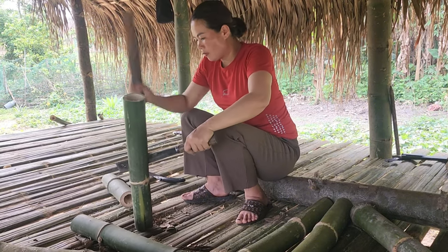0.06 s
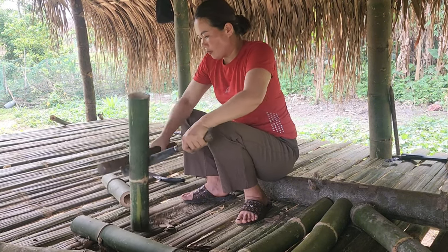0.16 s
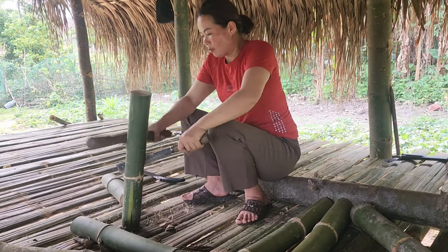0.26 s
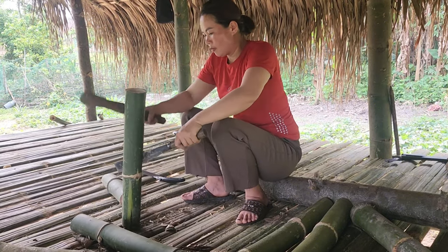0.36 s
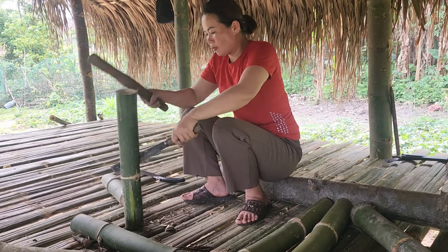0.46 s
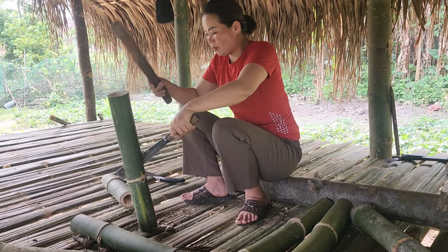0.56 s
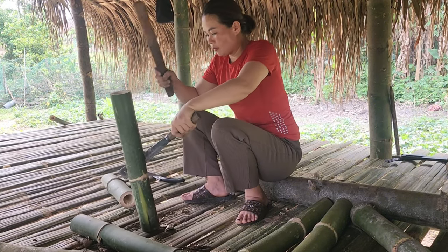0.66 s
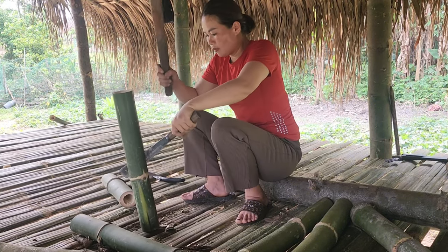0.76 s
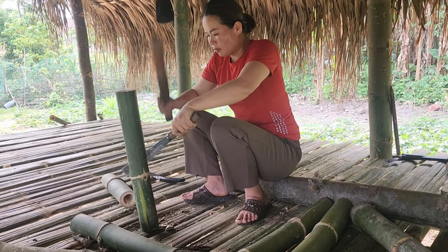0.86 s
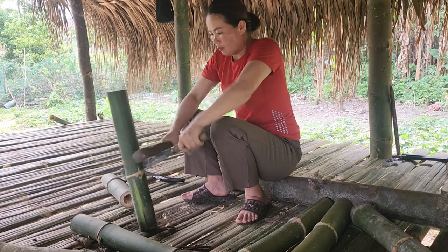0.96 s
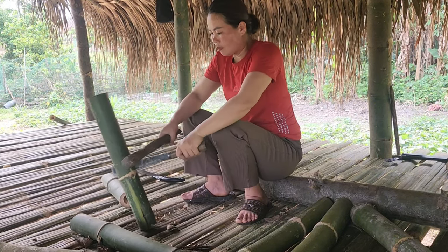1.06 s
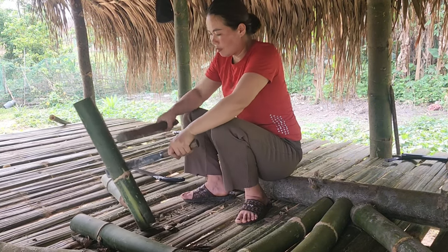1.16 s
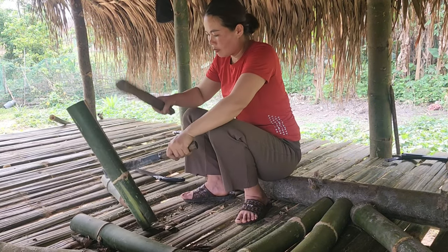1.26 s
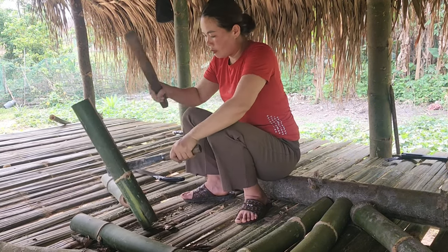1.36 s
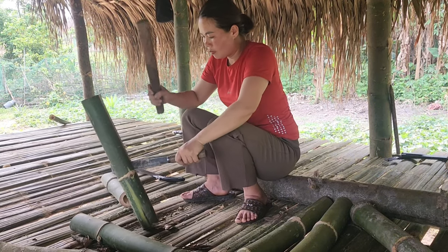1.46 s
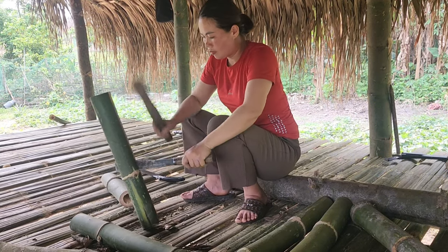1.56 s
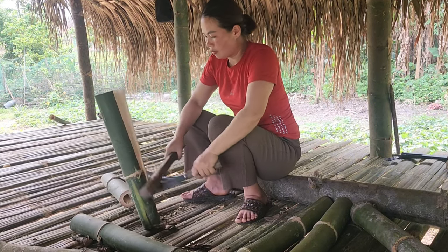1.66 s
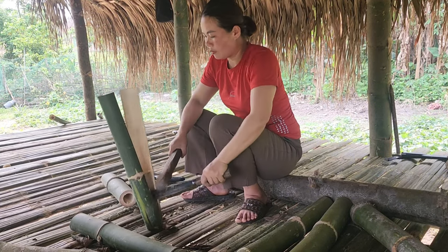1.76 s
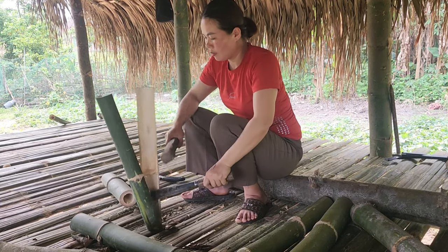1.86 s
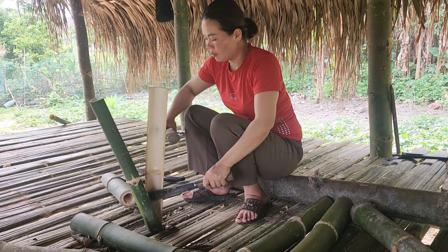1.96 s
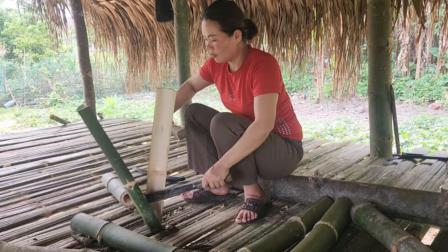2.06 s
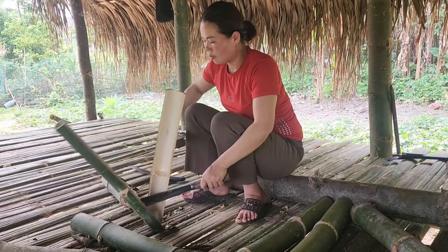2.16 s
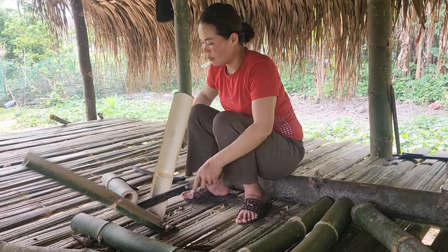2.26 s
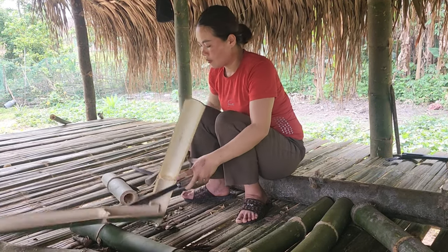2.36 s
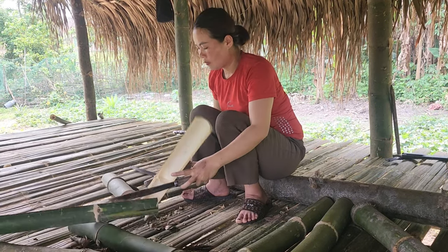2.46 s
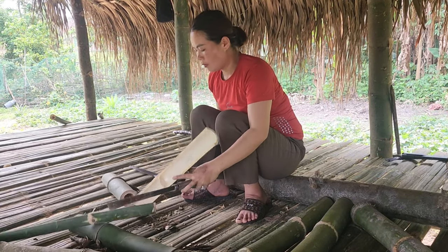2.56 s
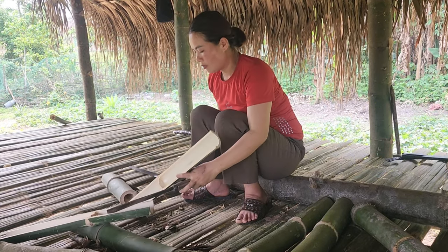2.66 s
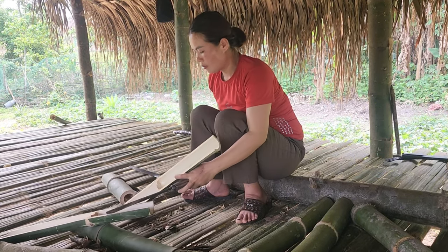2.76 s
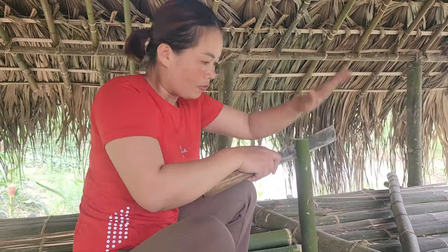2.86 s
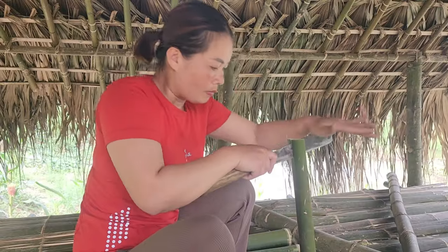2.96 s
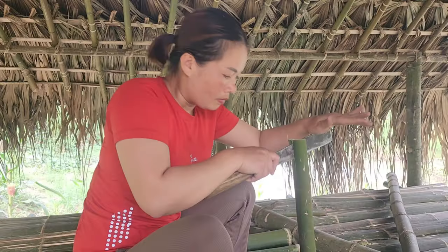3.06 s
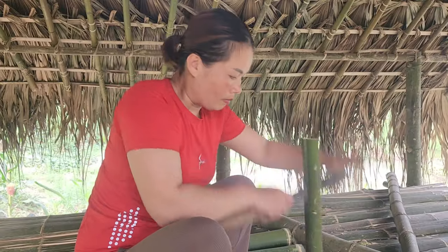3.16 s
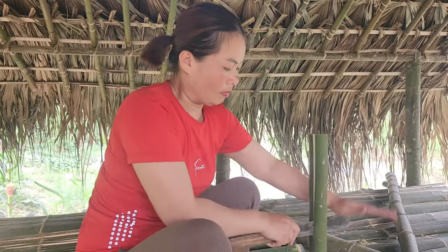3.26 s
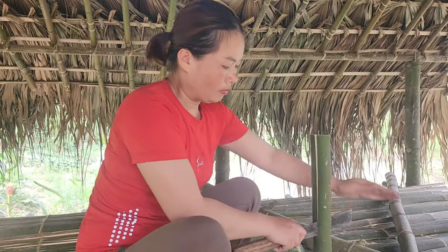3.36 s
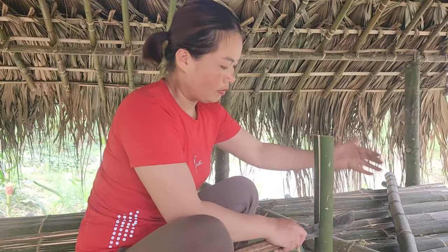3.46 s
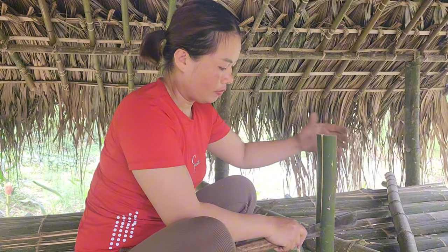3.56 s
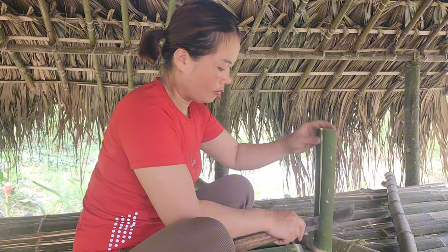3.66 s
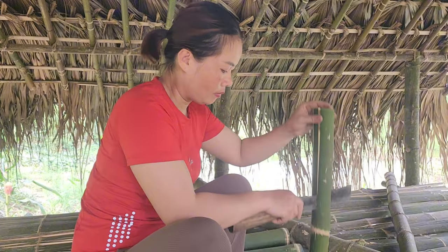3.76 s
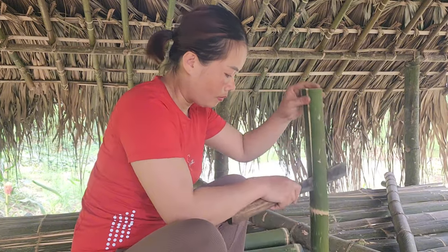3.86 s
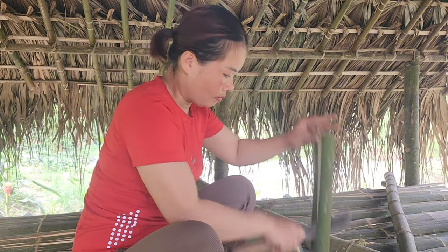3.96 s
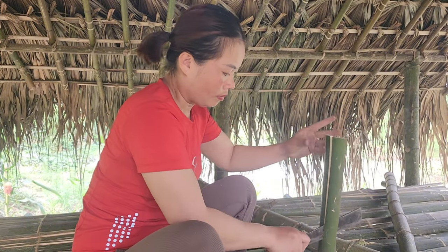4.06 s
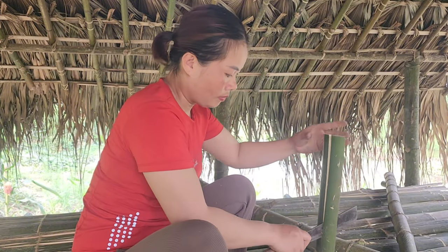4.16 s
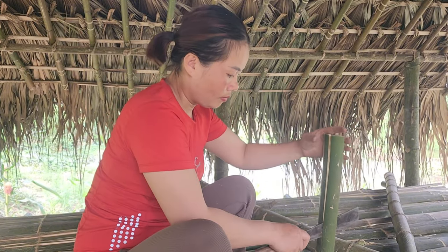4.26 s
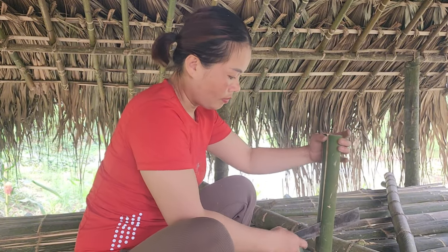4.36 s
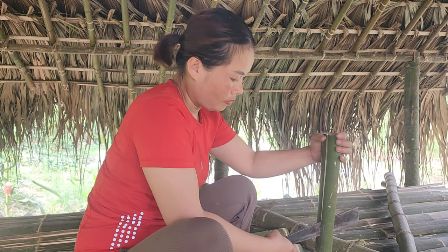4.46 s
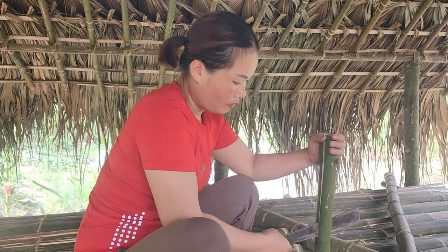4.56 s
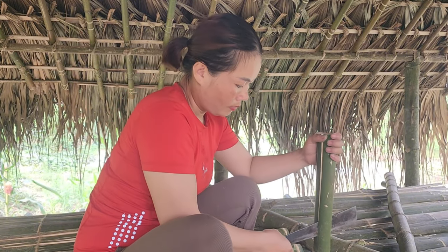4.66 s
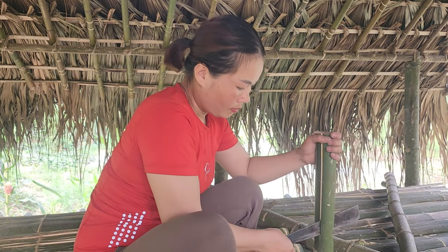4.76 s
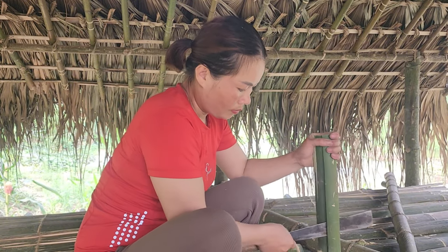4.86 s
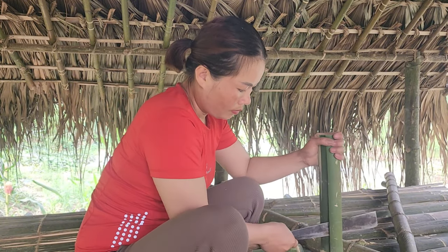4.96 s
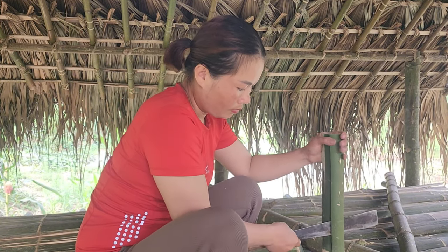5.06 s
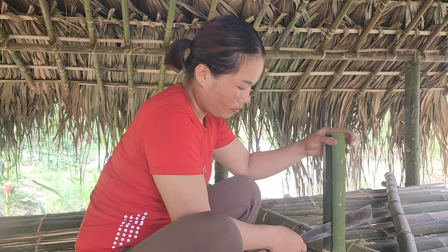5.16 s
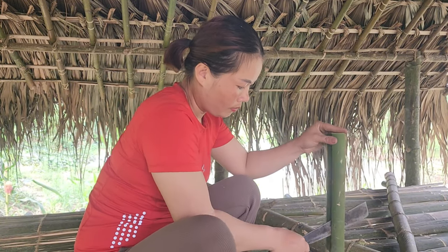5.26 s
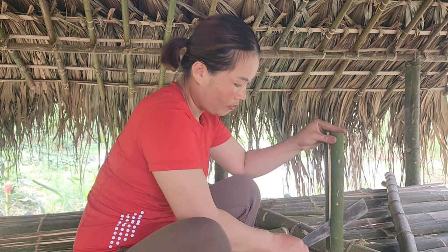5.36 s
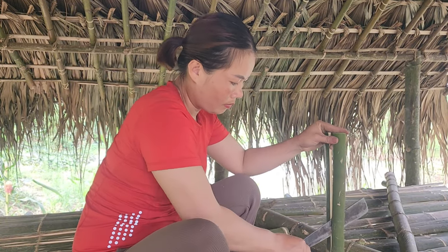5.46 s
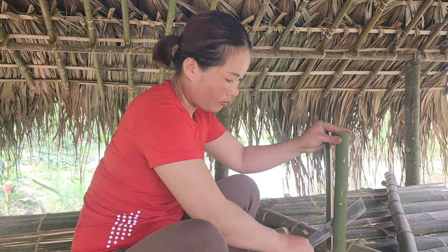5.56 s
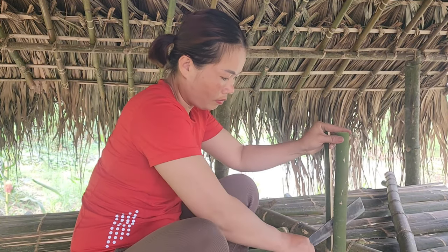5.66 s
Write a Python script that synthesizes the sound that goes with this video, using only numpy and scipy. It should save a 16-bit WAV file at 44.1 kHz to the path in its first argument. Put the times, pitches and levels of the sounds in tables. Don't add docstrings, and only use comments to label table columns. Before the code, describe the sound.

A club drives a blade through a bamboo tube, pieces fall ringing, then a nearer view brings one hard slap and crisp cracking fibres.

```python
import sys
import numpy as np
from scipy import signal
from scipy.fft import rfft, irfft
from scipy.io import wavfile
from scipy.ndimage import uniform_filter1d

SR = 44100
rng = np.random.default_rng(int(sys.argv[2]) if len(sys.argv) > 2 else 0)


def wav_out(sig):
    wavfile.write(sys.argv[1], SR, np.round(np.clip(np.atleast_2d(sig).T, -1, 1) * 32767).astype(np.int16))


def attenuation_scalar(level_db):
    decades = np.asarray(level_db, float) / 20
    return 10 ** decades


N = 251370
CUT_S = 2.88


def evened(x):
    return x / np.sqrt(np.mean(x ** 2) + 1e-20)


def peaked(x):
    return x / np.sqrt(uniform_filter1d(x ** 2, 180).max() + 1e-20)


def read(points, hz):
    f, value = np.transpose(points)
    return np.interp(np.log(hz + 1), np.log(f + 1), value)


def add(mix, s, sound):
    part = mix[..., round(s * SR):][..., :sound.shape[-1]]
    part += sound[..., :part.shape[-1]]


def split(x, hz):
    low = signal.lfilter(*signal.butter(2, hz, fs=SR), x)
    return low, x - low


def high_pass(x, order, hz):
    return signal.lfilter(*signal.butter(order, hz, "high", fs=SR), x)


def colour(x, points):
    log_gain = np.log(attenuation_scalar(read(points, abs(np.fft.fftfreq(4096, 1 / SR)))))
    minimum_phase = np.exp(np.conj(signal.hilbert(log_gain)))
    taps = np.fft.ifft(minimum_phase).real[:2048]
    return signal.oaconvolve(x, taps[None], axes=1)[:, :x.shape[1]]


# pitch_hz, level_db_per_hz
RUMBLE_SPECTRUM = [(15, -35), (25, 1), (108, -4.5), (229, -22), (796, -26), (911, -31), (3340, -27.5),
                   (5000, -34), (8360, -16.5), (11300, -40), (16000, -41)]
# pitch_hz, width_hz, level_db
INSECT_BANDS = [(7700, 1900, -12), (8494, 2500, -6.5)]
# time_s, level_db
CHORUS_LEVELS = [
    [(0, -69), (1.43, -73), (2.2, -68), (2.85, -64)],
    [(2.91, -59), (3.12, -57.5), (3.9, -55), (4.3, -59.5), (5.7, -56)],
]
# rumble_at_change_db, rumble_drift_db_per_s, mic_hiss_re_chorus_db
VIEWS = [
    (-61, 1, -16.5),
    (-50, -2, -21),
]
# pitch_hz, likeness_0_to_1
PORT_LIKENESS = [(60, 0.28), (300, 0.24), (1000, 0.84), (4000, 0.057), (12000, 0.25)]


def air():
    frames, hz, t = N // 256 + 5, np.fft.rfftfreq(1024, 1 / SR), np.arange(N) / SR
    view = (t > CUT_S).astype(int)
    insects_db = np.choose(view, [np.interp(t, *np.transpose(rows)) for rows in CHORUS_LEVELS])
    cut_db, drift_db, hiss_db = np.transpose(VIEWS)[:, view]
    band = sum(attenuation_scalar(db) / (1 + ((hz - f) / (w / 2)) ** 2) ** 2.7 for f, w, db in INSECT_BANDS)
    same = np.clip(read(PORT_LIKENESS, hz), 0, 1)[:, None]
    layers = (  # spectrum, level dB, patchiness dB
        (attenuation_scalar(read(RUMBLE_SPECTRUM, hz)), cut_db + drift_db * (t - CUT_S), 2.5),
        (band, insects_db - 0.5, 1.2),
        (hz / SR, insects_db + hiss_db, 1.5))
    out = 0
    for shape, level_db, patchy_db in layers:
        a, b, c, d, patches = rng.standard_normal((frames, 513, 5)).T
        patches = evened(uniform_filter1d(uniform_filter1d(patches, 14, 0), 12, 1))
        left = a + 1j * b
        right = same * left + np.sqrt(1 - same ** 2) * (c + 1j * d)
        z = np.array([left, right]) * shape[:, None] * attenuation_scalar(patchy_db * patches)
        noise = signal.istft(z, nperseg=1024, noverlap=768)[1][:, :N]
        out = out + evened(noise) * attenuation_scalar(level_db)
    return out


# start_s, end_s, start_hz, end_hz, level_db
WHISTLES = [(0, 0.04, 2610, 2620, -71), (0.034, .056, 2670, 2960, -71), (.045, 0.079, 6820, 7030, -58),
            (.08, 0.11, 7600, 7600, -55), (.425, 0.462, 7300, 7800, -59), (.455, .485, 7950, 8100, -58),
            (0.609, 0.663, 2650, 2650, -73), (.66, 0.686, 2695, 2950, -69), (.803, .82, 3600, 3350, -70),
            (0.816, .86, 3330, 3260, -75), (0.817, 0.861, 5815, 5630, -66), (1.208, 1.331, 1015, 960, -73),
            (1.241, 1.328, 2645, 2710, -73.5), (1.408, 1.547, 3400, 3280, -87.5),
            (2.034, 2.159, 1217, 1113, -70), (2.777, 2.844, 3386, 3250, -68),
            (3.672, 3.805, 3160, 3026, -68), (3.707, 3.903, 2140, 2063, -72),
            (4.51, 4.609, 3070, 3020, -71.5), (5.445, 5.601, 3060, 3030, -70.5),
            (5.419, 5.66, 2065, 2030, -74)]


def birds():
    out = np.zeros(N)
    for start, end, hz_0, hz_1, db in WHISTLES:
        hz = np.linspace(hz_0, hz_1, round((end - start) * SR))
        waver = 1 + 0.25 * evened(uniform_filter1d(rng.standard_normal(len(hz)), 500))
        whistle = np.sin(2 * np.pi * np.cumsum(hz) / SR) * signal.windows.tukey(len(hz), .6)
        add(out, start, attenuation_scalar(db) * waver * whistle)
    return out


def ring(modes, length, turn=0):
    t = np.arange(length) / SR
    return sum(attenuation_scalar(db - 60 * t / max(t60, .005)) * np.sin(2 * np.pi * hz * t + turn * (-1) ** k)
               for k, (hz, db, t60) in enumerate(modes))


def crackle(count, spread_db):
    return rng.standard_normal(count) * attenuation_scalar(spread_db * np.minimum(rng.exponential(1, count), 5))


def ports(count, spread_db, same):
    left = crackle(count, spread_db)
    other = abs(left) * rng.choice([-1., 1.], count)
    return np.array([left, same * left + np.sqrt(1 - same ** 2) * other])


# pitch_hz, level_db, t60_s
FLOOR_WIDE = [(64.4, -14, 0.28), (87, -3.5, 0.08), (111, -0.5, .15), (128, -1, 0.12), (155, -10, 0.08),
              (235, -13.5, 0.03), (330, -13.5, 0.1)]
# pitch_hz, level_db, t60_s
FLOOR_CLOSE = [(67.6, -10.5, 0.12), (101, -12.5, 0.09), (119.9, -4.5, 0.25), (132, 2, 0.079),
               (183, -12.5, 0.014), (267, -5, 0.062)]


def floor_boom(shake, s, length):
    return signal.fftconvolve(shake, ring(FLOOR_WIDE if s < CUT_S else FLOOR_CLOSE, length))[:len(shake)]


# pitch_hz, level_db_per_hz
FIBRE_SPECTRUM = [(180, -46), (350, -7.5), (1000, -4.5), (2200, -4.5), (3500, -4), (6000, -7.5),
                  (8000, -11), (10000, -18.5), (13000, -13), (15800, -11), (17000, -28)]


def knocks(rows, modes, crack_db, thin_hz, pan_db, edge_db):
    out, t = np.zeros((2, N)), np.arange(30000) / SR
    detune = .012
    pan = attenuation_scalar([[pan_db / 2], [-pan_db / 2]])
    for s, db, boom_db, top_db, t60 in rows:
        shifted = [(hz * (1 + detune * rng.standard_normal()), level, decay) for hz, level, decay in modes]
        body = np.array([ring(shifted, 9000, -0.53), ring(shifted, 9000, 0.15)])
        fade = attenuation_scalar(-60 * t / max(t60, .008))
        rattle = ports(len(t), 2.5, .55) * fade * np.minimum(t / .0009, 1)
        blow = rattle[:1] * fade
        blow[0, 40] = 1.3 * np.linalg.norm(blow)
        tube = signal.fftconvolve(blow, body, axes=1)[:, :len(t)]
        tube = high_pass(tube, 2, thin_hz)
        crack = high_pass(colour(rattle, FIBRE_SPECTRUM), 3, thin_hz)
        low, high = split(crack, 6700)
        low = split(low, 11000)[0]
        high = high + (attenuation_scalar(edge_db) - 1) * split(high, 11000)[1]
        boom = floor_boom(rattle[0], s, 16030)
        near = peaked(tube) + attenuation_scalar(crack_db) * peaked(low) + attenuation_scalar(top_db + 6.0) * peaked(high)
        add(out, s - .001, attenuation_scalar(db - 4.0) * (near * pan + attenuation_scalar(boom_db) * peaked(boom)))
    return out


# start_s, peak_db, floor_boom_re_peak_db, crack_top_re_peak_db,
# rattle_t60_s
BLOW_1 = [
    (0.15, -5.5, -19.5, -3.5, 0.028),
    (0.163, -13, -11, -3.5, 0.039),
    (0.171, -20, -6.5, -3, 0.1),
    (0.201, -30.5, -2.5, -1.5, 0.1),
    (.232, -40.5, -0.5, -6, 0.067),
]
BLOW_2 = [
    (0.933, -14, -21, 6.5, 0.031),
    (0.936, -4.5, -23.5, -8, 0.08),
]
BLOW_3 = [
    (1.6255, -16, -30, 0, 0.047),
    (1.629, -13.5, -24.5, -7, 0.092),
    (1.785, -46, -34, -1.5, 0.11),
]
# pitch_hz, level_db, t60_s
WHOLE_TUBE = [(270, -10, 0.06), (436, -14, 0.06), (605, -14, 0.08), (951, -8, 0.045), (1455, -12, .02),
              (2080, 5, 0.028), (2230, -1, .025), (3253, 6, 0.025), (3420, 1, .025), (4200, -8, 0.012)]
PART_SPLIT_TUBE = [(560, -3, .035), (640, -5, .03), (730, -3, .03), (1020, 2, .03), (1115, 0, .03),
                   (1750, -8, .025), (2030, -3, .025), (2290, -5, .04), (5300, -10, .012),
                   (6500, -11, .012)]
NEARLY_SPLIT_TUBE = [(620, -6, .025), (690, -3, .03), (815, 2, .04), (765, -1, .03), (900, -5, .03),
                     (1000, -9, .05), (1105, -8, .04), (1600, -11, .03), (1990, -9, .025), (2335, -8, .04),
                     (3300, -9, .025), (4600, -14, .015)]


def club_blows():
    out = knocks(BLOW_1, WHOLE_TUBE, -1.5, 390, 0.8, -1.6)
    out += knocks(BLOW_2, PART_SPLIT_TUBE, -4.0, 670, -0.55, 0.3)
    return out + knocks(BLOW_3, NEARLY_SPLIT_TUBE, -1.0, 665, 0.92, -0.87)


# start_s, peak_db, t60_s, shudder_re_peak_db, fizz_re_peak_db
TEAR_EVENTS = [(0.2, -30, 0.55, 3, -5), (0.975, -37, 0.72, -1.5, -2.5), (1.675, -40.5, 0.47, -8, -4),
               (1.795, -40, 0.23, -6, -8.5), (2.335, -29.5, 1, -5, -6), (2.392, -30.5, 0.76, -3.5, -8.5),
               (2.603, -29.5, 0.69, -7, -4.5), (3.127, -26.5, 0.3, -6.5, 7.5), (3.205, -35.5, 1, 4.5, -3.5),
               (4.035, -36.5, 1, -1, -1), (4.135, -36.5, 0.16, 3, -3), (4.685, -56, 0.65, 1.5, 19),
               (4.742, -44.5, 0.32, -14, 21.5), (4.806, -39.5, 0.33, -13, 14),
               (4.826, -24.5, 0.11, -9, 5.5), (4.846, -20, 0.042, -2.5, 6), (4.9, -52.5, 0.6, 10, -5.5)]
# peak_time_s, then as above
SCRAPE_EVENTS = [(0.564, -54.5, 1, -1, -12), (1.25, -62, 0.54, -5, -6.5), (2.08, -58, 0.91, -24, 2),
                 (3.122, -40.5, 0.063, 3, 3.5), (2.23, -46, 0.16, -30, -10), (3.18, -25.5, 0.2, -16, 8),
                 (3.322, -31, 0.16, 0.5, -3.5), (5.226, -43.5, 0.59, -1.5, 0.5),
                 (5.28, -53.5, 0.22, -3, 11)]


def tearing(rows, rise_s):
    rise_db = 19.5
    fade_bend = 0.69
    shudder_lingers, fizz_lingers = 0.19, 0.18
    out, t = np.zeros((2, N)), np.arange(20000) / SR - rise_s
    for s, db, t60, shudder_db, fizz_db in rows:
        clumps = attenuation_scalar(1.8 * evened(uniform_filter1d(rng.standard_normal(len(t)), 150)))
        breaks = ports(len(t), 1.6, 0.28) * clumps
        body, fizz = split(colour(breaks, FIBRE_SPECTRUM), 3800)
        fizz = high_pass(fizz, 2, 1900)
        slats = split(split(breaks[0], 480)[0], 480)[0]
        shudder = evened(floor_boom(breaks[0], s, 6000)) + 0.83 * evened(slats)
        fade_db = 60 * (np.maximum(t, 0) / max(t60, .03)) ** fade_bend
        level = attenuation_scalar(db - 4.5 - fade_db + rise_db * np.minimum(t / rise_s, 0))
        level = level * signal.windows.tukey(len(t), .01)
        parts = evened(body) + attenuation_scalar(fizz_db + fizz_lingers * fade_db) * evened(fizz)
        parts = parts + attenuation_scalar(shudder_db + shudder_lingers * fade_db) * evened(shudder)
        add(out, s - rise_s, level * parts)
    return out


def fibres():
    return tearing(TEAR_EVENTS, 0.0041) + tearing(SCRAPE_EVENTS, 0.034)


NUDGE_CONTACTS = [(0.42, -59.5, -12.5, -14, 0.09), (0.47, -57, -2, -7, 0.076),
                  (0.552, -55.5, -18, -5, 0.069), (0.565, -49, -3, -2, 0.1), (0.759, -66.5, 6.5, 8, 0.047),
                  (0.891, -76, -6, 15, 0.17), (1.737, -51.5, -10.5, 1.5, 0.21), (1.755, -65, -10, 16, .03),
                  (1.805, -66, -10, 13, .03), (1.952, -71, -10, 17, 0.021), (1.968, -43, -31, -20.5, 0.04),
                  (2.03, -72.5, -9.5, 14.5, 0.056), (2.065, -76, -10, 16, .04),
                  (2.118, -72, -9.5, 17, 0.047), (2.18, -73, -12, 16, 0.025),
                  (2.204, -58, -9.5, 11.5, 0.061), (2.224, -47.5, -24, 7, 0.074)]
# pitch_hz, level_db, t60_s
SLAT_MODES = [(370, -6, .06), (690, -6, .04), (960, 0, .05), (1190, -8, .04), (1620, -10, .03),
              (2670, -12, .03)]


def nudges():
    return knocks(NUDGE_CONTACTS, SLAT_MODES, 2.2, 300, 0.68, 3.0)


PARTING = [(2.333, -33, -32, -20, 0.05), (2.345, -34, -27, -17.5, 0.032), (2.364, -40, -28, -12, .03),
           (2.379, -38, -30, -13, 0.027), (2.405, -35, -30, -9, 0.023), (2.489, -28.5, -9, -2.5, 0.053),
           (2.496, -33.5, -13, -10, 0.043), (2.511, -37, -15, -10, .04)]
FIRST_LANDING = [
    (2.391, -14, -17, -19.5, 0.019),
]
SECOND_LANDING = [
    (2.592, -38.5, -1, -9, 0.019),
    (2.604, -18.5, -33, -21, 0.039),
    (2.68, -49.5, -4, -13, 0.023),
]
# pitch_hz, level_db, t60_s
PARTING_MODES = [(480, -3, 0.05), (1000, 2, 0.07), (1430, -2, 0.04), (1720, 6, 0.045), (2150, -3, .05),
                 (2700, 0, .05), (3450, 0, .03)]
FIRST_HALF_MODES = [(807, -18, .05), (984, 9, 0.055), (974, -15, 0.3), (1357, -2, 0.08), (1742, 4, 0.05),
                    (2263, -5, 0.1), (2680, 2, 0.025), (3200, -3, .02)]
SECOND_HALF_MODES = [(600, -7, 0.15), (964, -10, 0.08), (1340, -6, 0.1), (1650, 0, 0.04), (2270, 4, 0.07),
                     (2443, -6, 0.12), (3490, -4, 0.03)]


def falling_halves():
    landed = attenuation_scalar(-200 * np.maximum(np.arange(N) / SR - 2.6, 0))
    out = knocks(PARTING, PARTING_MODES, 2.3, 366, 0.35, -2.9)
    out += knocks(FIRST_LANDING, FIRST_HALF_MODES, 0.18, 170, 1.3, 0.3) * landed
    return out + knocks(SECOND_LANDING, SECOND_HALF_MODES, -0.074, 220, 4.0, 0.3)


# start_s, end_s, pitch_hz, level_db, rise_s, t60_s
HOLLOW_TONES = [
    (2.392, 2.6, 441, -33, .018, .9),
    (2.392, 2.5, 587, -29, .015, .2),
    (2.45, 2.78, 598, -42, .03, .9),
    (2.365, 2.42, 400, -38, .006, .1),
    (2.41, 2.6, 797, -50, .01, .6),
]


def hollow():
    out = np.zeros(N)
    for start, end, hz, db, rise_s, t60 in HOLLOW_TONES:
        t = np.arange(0, end - start, 1 / SR)
        swell = (1 - np.exp(-t / max(rise_s, .002))) * np.minimum((end - start - t) / .012, 1)
        add(out, start, swell * attenuation_scalar(db - 60 * t / t60) * np.sin(2 * np.pi * hz * t))
    return out


SLAP_CONTACTS = [
    (2.933, -36.5, 12, -27, 0.15),
    (3.627, -52, -12, -32.5, 0.147),
    (3.9752, -8.5, -11, -3, 0.03),
    (3.9805, -12, -6.5, -9, 0.06),
    (3.985, -15.5, -5, -2, .08),
    (3.9895, -17.5, -8.5, -1, 0.14),
    (4.0265, -22.5, 4, -13.5, 0.088),
]
# pitch_hz, level_db, t60_s
THIN_TUBE = [(345, 7, 0.08), (540, -1, 0.05), (1040, -16, 0.04), (1360, -7, .03), (1521, -3, 0.035),
             (2040, -3, 0.02), (2265, -7, 0.03), (2655, -6, .03), (3190, -4, .03), (4400, -5, .02),
             (5600, -5, .015)]


def hand_slaps():
    return knocks(SLAP_CONTACTS, THIN_TUBE, 1.2, 310, 0.86, -7.0)


SLIP_CONTACTS = [(3.1258, -27.5, -12, -2, 0.022), (3.137, -25.5, -31, -12, 0.034),
                 (3.1727, -29, -25, 5, 0.02), (3.1787, -32, -39, 7, 0.034), (3.1835, -27, -30, -3, .02),
                 (3.1904, -32.5, -5, 10, 0.027), (3.2034, -31, 5, -4, 0.045),
                 (3.235, -35.5, 5.5, -3, 0.039), (3.288, -43, 10, -10, 0.016),
                 (3.3143, -38, -21, -11, 0.03), (3.321, -35.5, 1, -12, 0.025), (3.327, -39, -9, -15, 0.037),
                 (4.13, -41, -14, -6, 0.041), (4.2113, -64, -13, 13, 0.032),
                 (4.2494, -61, -3.5, 7.5, 0.025), (4.5594, -65, -7.5, 4, 0.028),
                 (5.6094, -63.5, -14.5, 9.5, 0.036)]
# pitch_hz, level_db, t60_s
BLADE_MODES = [(1300, -4, .02), (2000, 0, .02), (2700, -3, .015), (5300, -10, .008)]


def blade_slips():
    return knocks(SLIP_CONTACTS, BLADE_MODES, 3.16, 700, 0.38, 1.9)


SNAP_CONTACTS = [(4.6335, -39.5, -10, 0, 0.027), (4.6831, -34.5, -45, -1.5, 0.022),
                 (4.709, -40.5, -32, 3, 0.028), (4.7385, -22.5, -43, 4.5, 0.024),
                 (4.805, -34.5, -41.5, 5, 0.04), (4.8223, -9.5, -24.5, 0, 0.018),
                 (4.8329, -16.5, -30, -1.5, 0.028), (4.8424, -8, -29.5, -6, 0.04),
                 (4.934, -35, -26.5, -10.5, 0.073), (5.2174, -48.5, -39, -15, 0.025),
                 (5.2764, -47, 7, -19, 0.046)]
# pitch_hz, level_db, t60_s
SPLIT_TUBE = [(1090, -6, .02), (1330, -6, .02), (2070, 1, .016), (2170, 3, .018), (2800, -7, .012),
              (3300, -3, .016), (4750, -5, .015)]


def fibre_snaps():
    return knocks(SNAP_CONTACTS, SPLIT_TUBE, -11.0, 1000, 0.382, 1.5)


# pitch_hz, t60_s
SHELTER_DECAY = [(100, 0.16), (500, 0.25), (1000, 0.14), (2000, 0.12), (8000, 0.15), (16000, 0.04)]


def shelter(x):
    taps = np.zeros((2, 30000))
    at = np.arange(120, 29960, 20) + rng.integers(0, 20, (2, 1492))
    np.put_along_axis(taps, at, rng.choice([-1., 1.], at.shape), 1)
    hz, t, z = signal.stft(taps, SR, nperseg=256)
    tail = signal.istft(z * attenuation_scalar(-60 * t / read(SHELTER_DECAY, hz)[:, None]), SR, nperseg=256)[1]
    return signal.fftconvolve(x, tail / np.linalg.norm(tail[0]), axes=1)[:, :N]


def scene():
    t = np.arange(N) / SR
    before = t < CUT_S
    work = birds() + club_blows() + fibres() + nudges() + falling_halves()
    work += hand_slaps() + blade_slips() + fibre_snaps()
    work = np.where(before, work - .5 * split(work, 10000)[1], work)
    near = work + hollow() + air()
    late = np.roll(near, 4, axis=1)
    direct = np.array([np.where(before, near[0], late[0]), np.where(before, late[1], near[1])])
    gap = np.clip((abs(t - CUT_S) - 0.016) / 0.002, 0, 1)
    return (direct + attenuation_scalar(-9.0) * shelter(work)) * gap


def smear(x):
    z = signal.stft(x, nperseg=2048, noverlap=1024)[2]
    bands = uniform_filter1d(rng.standard_normal(z.shape[1:]), size=9, axis=0)
    haze = z * np.exp(2j * np.pi * rng.random(z.shape)) * attenuation_scalar(6.0 * evened(bands) - 29)
    return x + signal.istft(haze, nperseg=2048, noverlap=1024)[1][:, :N]


def low_pass(x):
    return signal.sosfilt(signal.butter(12, 16990, fs=SR, output="sos"), x)


def record(dry):
    hz = np.fft.rfftfreq(N, 1 / SR)
    held = np.tanh(dry / 1.15) * 1.15
    mid, side = rfft(held[0] + held[1]) / 2, rfft(held[0] - held[1]) / 2
    side = side * np.sqrt(0.004 + 1 / (1 + (480 / (hz + 1)) ** 4))
    low_cut = 1 / np.sqrt(1 + (56 / (hz + 1)) ** 6)
    band_limit = np.interp(hz, [15800, 16050, 17000], [1, .12, .03])
    heard = irfft(np.array([mid + side, mid - side]) * low_cut * band_limit, N)
    return low_pass(smear(heard))


dry = scene()
out = record(dry)
wav_out(out)
```